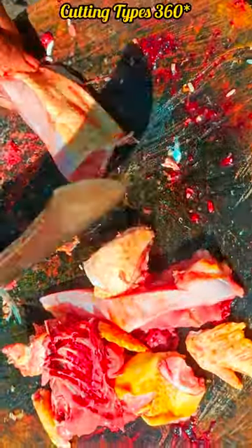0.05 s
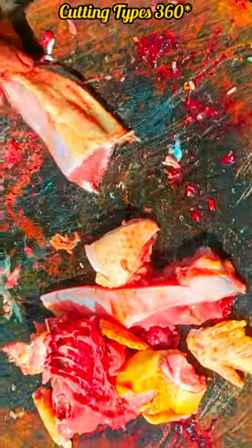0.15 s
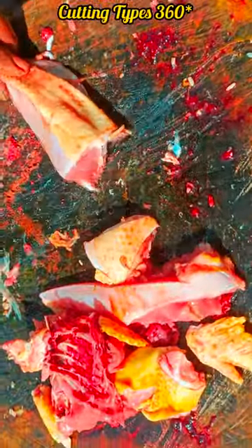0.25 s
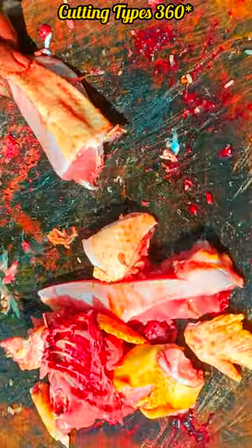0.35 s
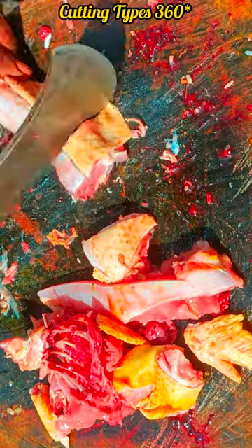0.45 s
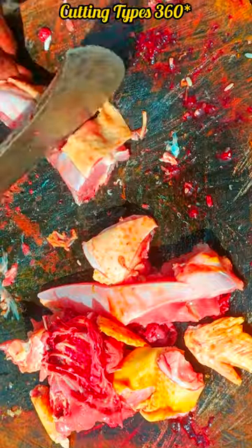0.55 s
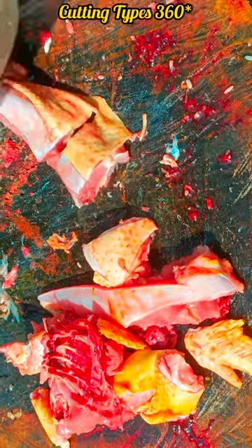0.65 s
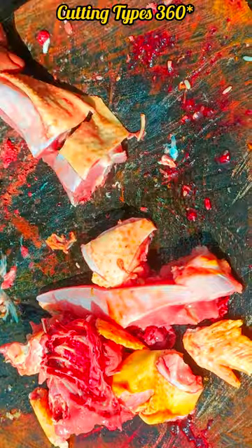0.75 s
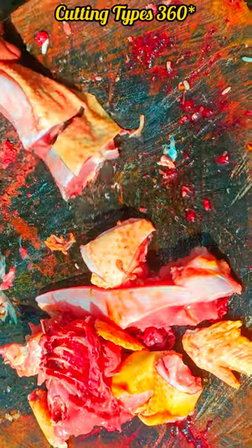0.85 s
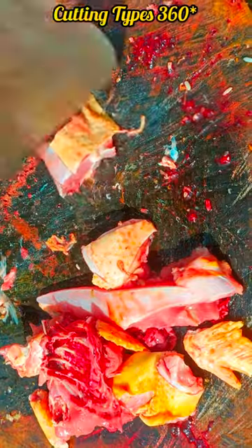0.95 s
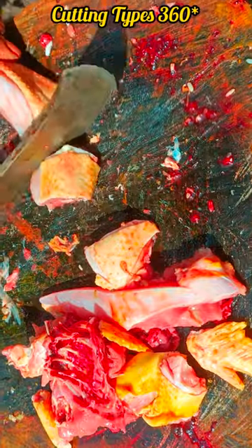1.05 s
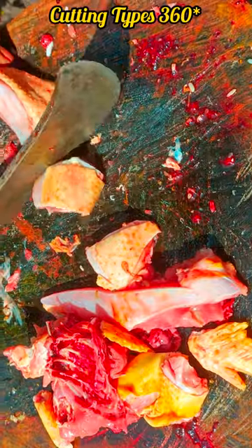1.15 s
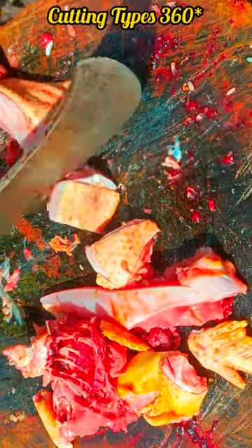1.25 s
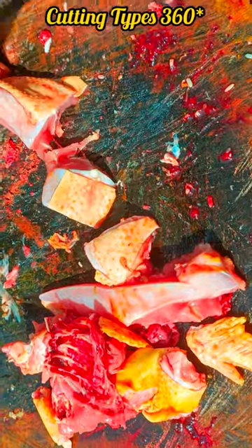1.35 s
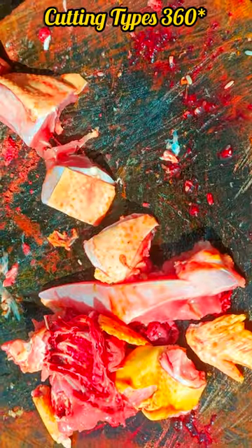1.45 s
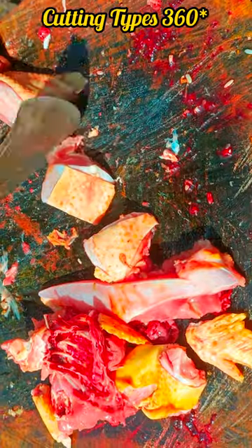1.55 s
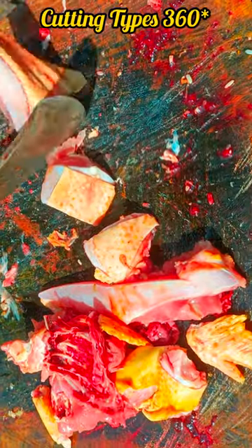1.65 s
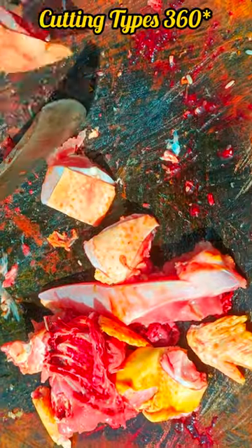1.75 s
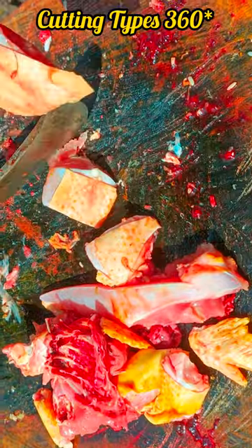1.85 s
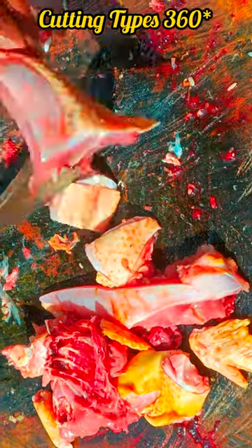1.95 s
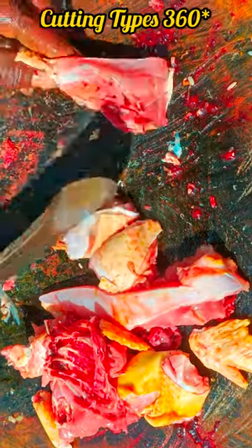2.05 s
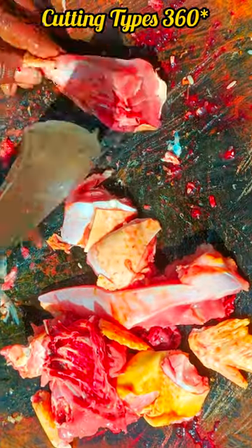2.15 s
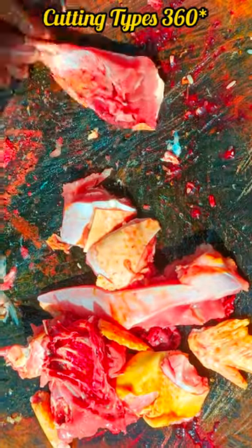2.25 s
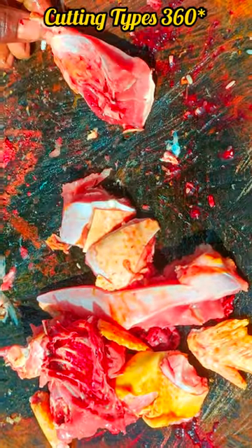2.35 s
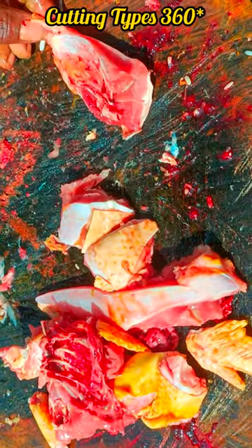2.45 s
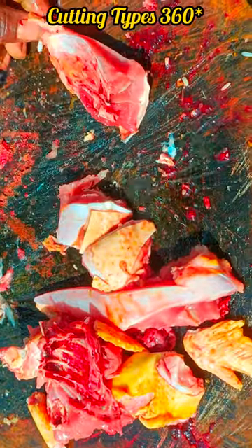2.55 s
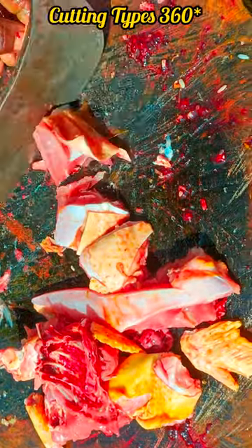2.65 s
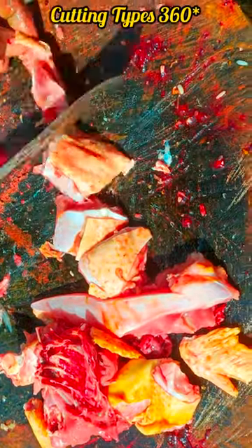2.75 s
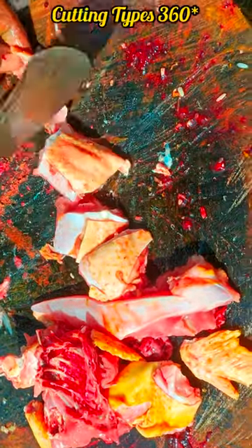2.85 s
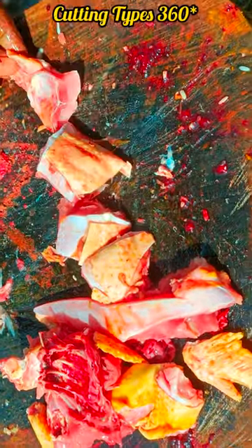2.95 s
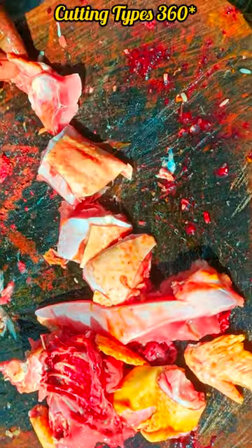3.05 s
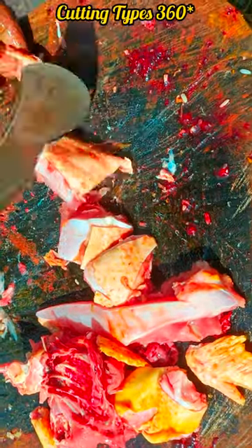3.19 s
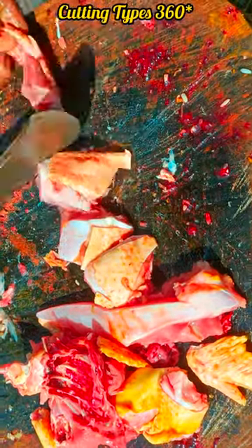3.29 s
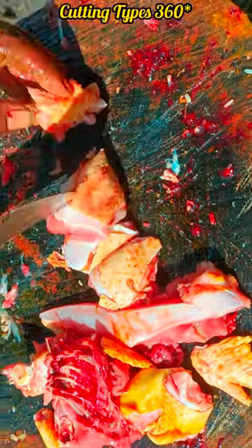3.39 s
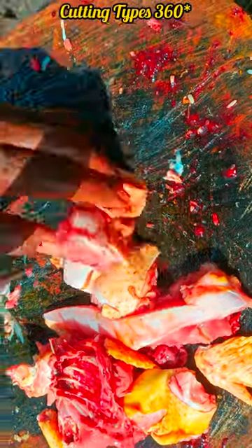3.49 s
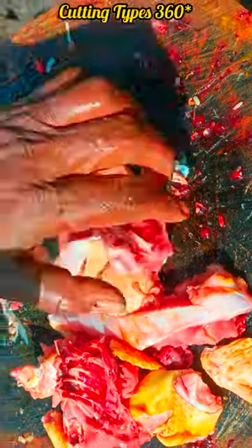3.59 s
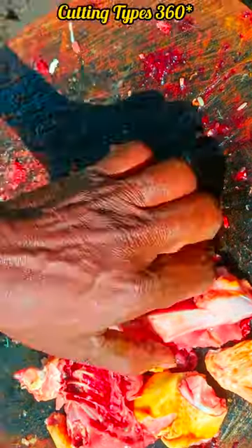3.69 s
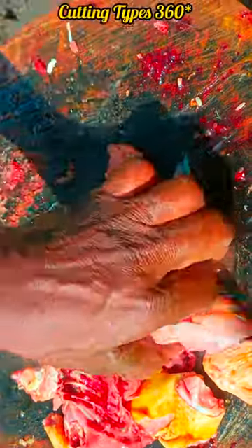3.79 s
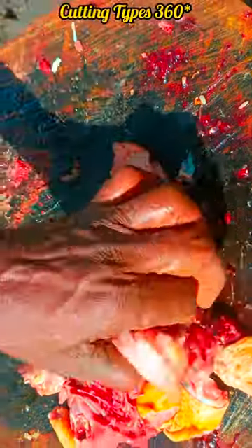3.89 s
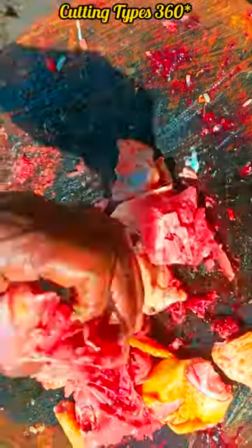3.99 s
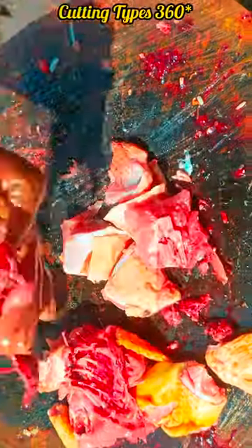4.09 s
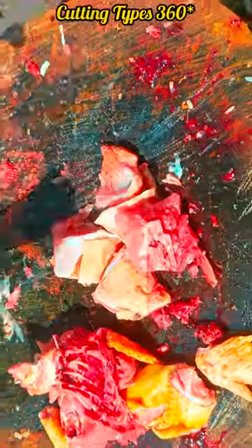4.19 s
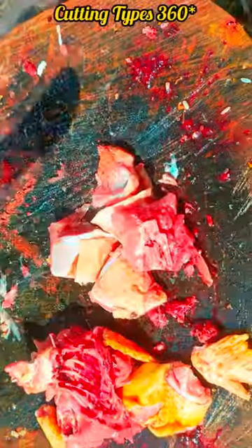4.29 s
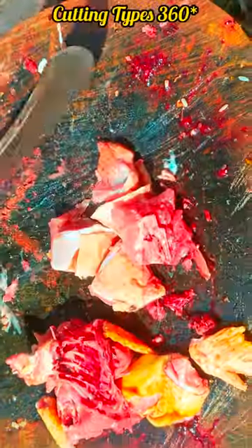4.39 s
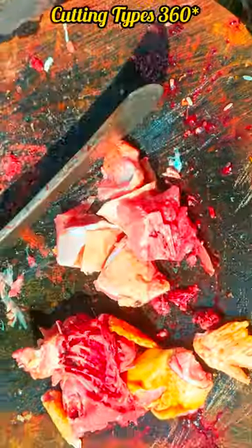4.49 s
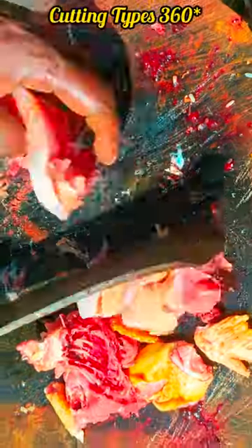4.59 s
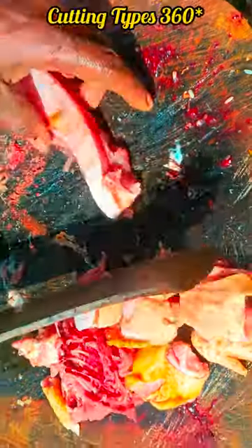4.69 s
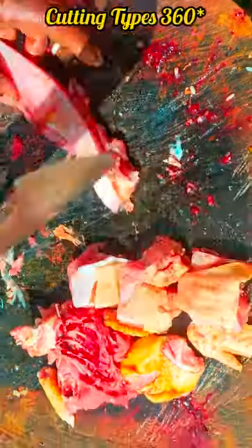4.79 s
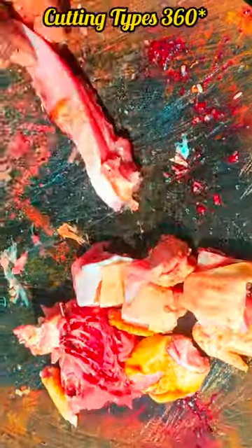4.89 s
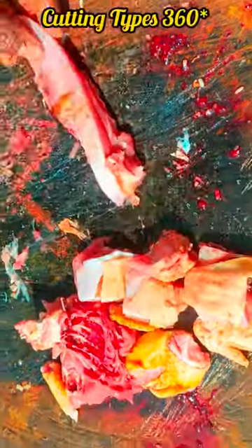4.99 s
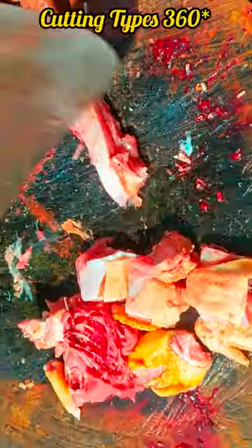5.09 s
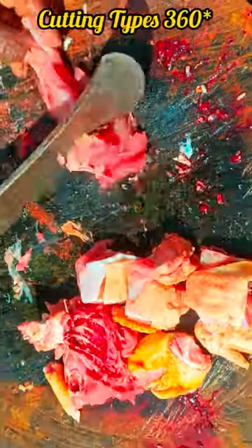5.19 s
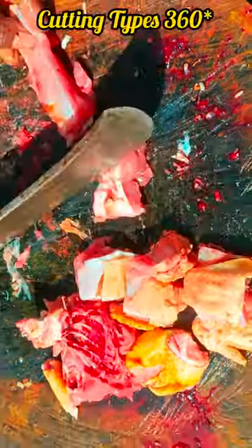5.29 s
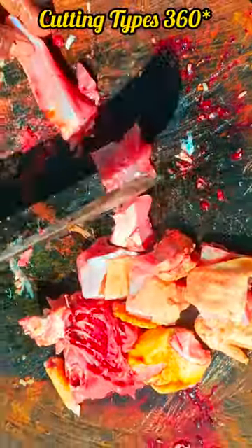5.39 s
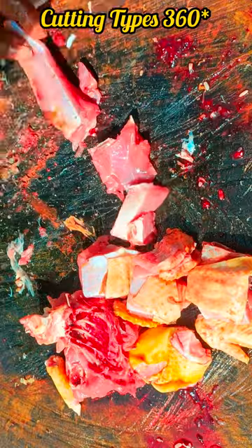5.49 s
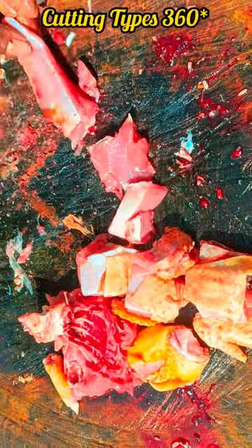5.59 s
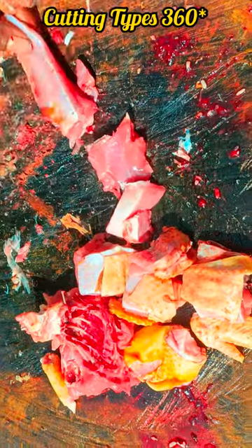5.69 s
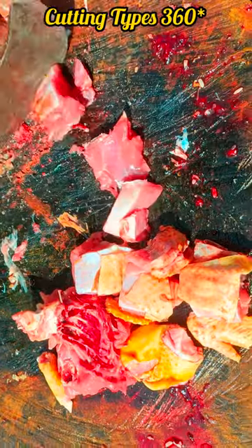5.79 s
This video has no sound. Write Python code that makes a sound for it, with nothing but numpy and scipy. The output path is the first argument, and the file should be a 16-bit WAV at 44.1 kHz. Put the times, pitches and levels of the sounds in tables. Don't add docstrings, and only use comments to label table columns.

```python
import sys
import numpy as np
from scipy import signal
from scipy.fft import rfft, irfft
from scipy.io import wavfile
from scipy.ndimage import uniform_filter1d

SR = 44100
rng = np.random.default_rng(int(sys.argv[2]) if len(sys.argv) > 2 else 0)


def rack_gain(trim_db):
    fader = np.asarray(trim_db, float)
    return 10 ** (fader / 20)


def pcm_store(signal):
    levels = np.round(np.clip(np.atleast_2d(signal), -1, 1) * 32767)
    wavfile.write(sys.argv[1], SR, levels.astype(np.int16).T)


N = 257544
TIME = np.arange(N) / SR
RING = TIME[:SR // 4]

# time steel meets block in s, thump in dB, edge click in dB, stand ring in dB,
# share sent to the walls in dB.
CHOP_BLOWS = [
    (0.4673, -7.5, -20, -27, -1.5),
    (1.0249, -6.5, -18, -25, -1),
    (1.6336, -6, -19, -41, -4),
    (2.6502, -6, -19.5, -20, 1),
    (3.2545, -5.5, -17, -21.5, 0),
    (5.1593, -9, -15, -31, -2.5),
    (5.806, -6.5, -18, -41, -9.5),
]
# frequency in Hz, level in dB, t60 in s.
BLADE_MODES = [(1001, -5.5, 0.13), (2600, -41.5, 0.016), (3450, 5, 0.022), (3660, -5, 0.037),
               (4510, -3, 0.05), (4700, -14, 0.036), (6315, 18.5, 0.028), (7780, 8.5, 0.027),
               (9100, -3, .05), (9000, -27, .05), (10660, 14, 0.031), (12800, 4, 0.017), (14260, -5, .04)]


def curve(table, hz):
    f, db = np.transpose(table)
    return np.interp(np.log(hz + 1), np.log(f), db)


def colour(x, table):
    cepstrum = irfft(np.log(rack_gain(curve(table, np.fft.rfftfreq(4096, 1 / SR)))))
    cepstrum[1:2048] *= 2
    cepstrum[2049:] = 0
    return signal.fftconvolve(x, irfft(np.exp(rfft(cepstrum))))[:N]


def band(x, hz, width):
    edges = [hz / width, min(hz * width, .45 * SR)]
    return signal.sosfilt(signal.butter(2, edges, "band", fs=SR, output="sos"), x)


def unit(x):
    return x / np.sqrt(np.mean(x ** 2))


def add(out, s, x):
    i = max(int(s * SR), 0)
    out[i:i + len(x)] += x[:N - i]


def ring(modes):
    return sum(rack_gain(db) * np.cos(2 * np.pi * hz * RING) * 1000 ** (-RING / t60) for hz, db, t60 in modes)


def grit(count, spread_db):
    draw = rng.standard_normal(count) * rack_gain(spread_db * rng.exponential(size=count))
    return unit(draw)


def push(out, s, db, ms):
    u = (RING[:400] - RING[200]) / (ms * 3.2e-4)
    add(out, s - RING[200], rack_gain(db) * (1 - 0.89 * u ** 2) * np.exp(-u ** 2 / 2))


def air(level_db=-56):
    # frequency in Hz, level in dB.
    air_gain = [(30, -34.5), (60, 1), (110, 12), (200, 1.5), (500, 0.5), (1200, 3), (2500, -2), (4500, -8),
                (6000, -17), (9000, -22.5), (16000, -24.5)]
    # frequency in Hz, level in dB.
    left_shade = [(300, -2), (700, -2), (1300, -6), (2500, -2), (4500, -3.5), (7000, 10.5)]
    low = signal.butter(1, 700, fs=SR, output="sos")
    shared = signal.sosfilt(low, rng.standard_normal(N))
    pair = [shared + (n - 0.31 * signal.sosfilt(low, n)) for n in rng.standard_normal((2, N))]
    sway = rack_gain(1.0 * unit(band(rng.standard_normal(N), 3.5, 18.0)))
    left = colour(colour(pair[0], air_gain), left_shade)
    return rack_gain(level_db) * sway * np.array([left, colour(pair[1], air_gain)])


def insects(left_db=-5):
    # start in s, length in s, frequency in Hz, level in dB.
    near_songs = [(0.363, 0.022, 4850, -54), (0.905, 0.03, 4830, -61), (.935, 0.056, 4700, -65),
                  (1.254, .1, 4700, -64.5), (1.896, 0.45, 4660, -68.5), (2.23, 0.33, 4830, -67),
                  (2.299, 0.17, 5070, -68), (3.535, 0.04, 4860, -59), (3.647, 0.57, 4640, -64.5),
                  (3.944, 0.089, 3415, -66), (4.552, 0.058, 4720, -55.5), (4.607, 0.067, 4970, -57),
                  (4.701, 0.29, 4600, -67.5)]
    # time in s, level in dB.
    chorus_level = [
        (0.0, -74),
        (0.44, -68),
        (0.8, -72.5),
        (1.89, -73.5),
        (3.17, -70),
        (3.61, -68.5),
        (4.36, -72.5),
        (4.65, -69),
        (4.96, -71),
        (5.84, -70),
    ]
    song_width_hz = 70
    songs = [(s, length, hz, song_width_hz, db) for s, length, hz, db in near_songs]
    songs += [(2.9 + k * .081, .03, 4300, song_width_hz, -66) for k in range(4)]
    songs += [(s, 0.31, 6200, 1300, -63.5) for s in (1.1, 2.212)]
    out = np.zeros(N)
    for s, length, hz, width_hz, db in songs:
        t = TIME[:int(length * SR)]
        span = SR / width_hz / 2
        tremble = uniform_filter1d(rng.standard_normal((2, SR)), int(span))[:, :len(t)] * np.sqrt(span)
        voice = (0.38 + tremble[0]) * np.cos(2 * np.pi * hz * t) + tremble[1] * np.sin(2 * np.pi * hz * t)
        add(out, s, rack_gain(db) * np.sin(np.pi * t / length) ** .5 * voice)
    swell = rack_gain(np.interp(TIME, *np.transpose(chorus_level)) + 4.5)
    chorus = [swell * unit(band(rng.standard_normal(N), 5000, 1.35)) for _ in range(2)]
    return (out + np.array(chorus)) * rack_gain(np.array([[left_db], [0]]))


def wind(bed_db=-62, gust_db=-14, rough=0.47):
    # time in s, peak in dB, length in ms.
    puffs = [(1.426, -43, 18), (1.488, -37.5, 17.5), (1.523, -34, 27), (1.559, -29, 10),
             (1.584, -15.5, 9.1), (1.614, -10.5, 4.5), (1.685, -16, 15.4), (1.739, -34.5, 37),
             (1.927, -31, 4.2), (1.978, -42, 12), (2.069, -33.5, 5.4), (2.102, -25.5, 9.6),
             (2.146, -35, 5.4), (2.337, -45, 12.5), (3.672, -34, 19.6), (3.719, -19.5, 6.8),
             (3.777, -43.5, 49), (4.311, -41.5, 16), (4.862, -34, 14), (5.021, -43.5, 14),
             (5.132, -32.5, 25), (5.345, -24, 21), (5.363, -18.5, 5.06), (5.396, -25.5, 16),
             (5.425, -18.5, 9.9), (5.495, -31.5, 44), (5.521, -33.5, 10.5), (5.671, -31.5, 8.8)]
    out, gust = np.zeros(N), np.zeros(N)
    u = RING[:4000] - RING[2000]
    for (s, db, ms), turn in zip(puffs, rng.random(len(puffs))):
        hz = 124 + 1.86 * db + 168 / ms
        swell = rack_gain(db) * np.exp(-(u / (ms * 7e-4)) ** 2)
        ragged = unit(band(band(rng.standard_normal(len(u)), 1.37 * hz, 1.04), 1.43 * hz, 1.45))
        add(out, s - RING[2000], swell * (np.cos(2 * np.pi * (hz * u + turn)) + rough * ragged))
        add(gust, s - RING[2000], rack_gain(db + gust_db) * np.exp(-(u / 0.02) ** 2))
    flutter = unit(band(rng.standard_normal(N), 4, 3.0))
    out = out + rack_gain(-66 + 3.5 * flutter) * unit(band(rng.standard_normal(N), 42, 1.3))
    return out + (gust + rack_gain(bed_db + 4.8 * flutter)) * unit(band(rng.standard_normal(N), 85, 1.4))


def blade():
    # start in s, level in dB, length in ms, treble in dB.
    taps = [
        (0, -35.5, 19, -12),
        (.0085, -27.5, 8.4, -20.5),
        (0.023, -36.5, 11.4, -17),
        (0.035, -47, 6, -25),
        (4.483, -42.5, 67, -9),
        (4.513, -36.5, 5, -12.5),
        (4.516, -43, 34, -6),
        (4.527, -31.5, 31, -8.5),
    ]
    out = np.zeros(N)
    for s, db, ms, treble_db in taps:
        phase = RING * 4000 / ms
        swell = rack_gain(db) * phase * np.exp(1 - phase)
        modes = [(hz * (1 + 0.0096 * rng.standard_normal()), g + treble_db * (hz > 5500), t60)
                 for hz, g, t60 in BLADE_MODES]
        add(out, s, swell * (ring(modes) + rack_gain(-12) * band(grit(len(RING), 2.0), 3300, 2.5)))
    return out


def block(blows, ring_db=-27, edge_db=-28, detune=0.05, scatter_db=2.0, damping=0.44):
    # frequency in Hz, level in dB, t60 in s.
    wood_modes = [(205, -14, 0.01), (225, -7.5, 0.083), (269, -7.5, 0.071), (312, -23.5, 0.12),
                  (430, -17.5, 0.013), (561, -12.5, 0.055), (670, -26.5, 0.069)]
    # frequency in Hz, level in dB, t60 in s.
    edge_modes = [(812, -4.5, 0.05), (1034, 0, 0.05), (1330, -11, 0.068), (1540, -6, 0.015),
                  (1803, -3.5, 0.11), (2050, -24, 0.15), (2718, -12.5, 0.0066)]
    out = np.zeros(N)
    spots = rng.standard_normal((len(blows), 2, 2 * len(edge_modes)))
    for (s, db, ms, click_db), spot in zip(blows, spots):
        force, edge = np.zeros(len(RING)), np.zeros(len(RING))
        push(force, .01, db, ms)
        push(edge, .01 - .0004, click_db, 0.55)
        upper = [(hz * (1 + detune * a), g + scatter_db * b, damping * t60)
                 for (hz, g, t60), a, b in zip(edge_modes + edge_modes, *spot)]
        body = rack_gain(ring_db) * signal.fftconvolve(force, ring(wood_modes))
        body = body + rack_gain(edge_db) * signal.fftconvolve(edge + .15 * force, ring(upper))
        add(out, s - .01, force + edge + body[:len(RING)])
    return out


def handling(snap=0.98, wide=1.75):
    # time in s, peak in dB, centre in Hz, length in ms.
    ticks = [(.089, -54, 8600, 1.5), (0.099, -45, 6950, 1.6), (1.071, -37, 7500, 2.5),
             (3.587, -54, 9000, 1), (3.522, -52, 2500, 3), (3.91, -40, 8000, 5.5), (5.415, -53, 9000, 6.2),
             (4.655, -46, 9000, 1.5), (.1482, -50, 11000, 1.2), (2.1035, -41, 8000, 1.2),
             (2.1339, -38.5, 5850, 10), (2.7243, -41, 6300, 2.6), (2.785, -50.5, 9000, 6.9),
             (3.4417, -58, 12030, 1.3), (3.505, -50.5, 6900, 2), (3.6072, -52, 13000, 0.93),
             (3.6761, -51.5, 9900, 1), (3.567, -48, 3780, 1.33), (3.8174, -45, 8333, 2),
             (3.8547, -48, 13500, 0.85), (3.891, -37, 3660, 2.1), (3.9083, -40, 11020, 4),
             (4.086, -36, 3300, 5.4), (4.66, -33.5, 4500, 2), (4.66, -39, 11000, 2.05),
             (4.6684, -19.5, 3700, 7.5), (4.669, -25.5, 11120, 4.6), (4.6682, -18.5, 2600, 4.1),
             (4.9003, -42.5, 9000, 2.9), (5.3405, -43, 8650, 3.5), (5.5639, -56, 8000, 1.2),
             (5.574, -42, 3500, 4), (5.669, -21.5, 10200, 0.6), (5.67, -19, 2600, 0.38)]
    # start in s, length in s, level in dB, centre in Hz.
    drags = [(3.8, 0.063, -59, 5500), (3.619, 0.23, -67, 9000), (3.92, 0.075, -64, 9940),
             (4.4, 0.103, -58, 5200), (4.46, 0.076, -57, 3300), (4.58, 0.13, -51, 4600),
             (4.659, 0.13, -57.5, 2600), (4.69, 0.122, -56, 8100), (4.751, 0.24, -67.5, 7100),
             (5.4, 0.043, -62, 10630), (5.575, 0.045, -54, 2400), (3.4, .24, -67, 10000),
             (3.94, .24, -67, 8000), (3.2, .04, -62.5, 11000), (5.6, 0.13, -65, 7600),
             (5.25, 0.21, -69, 8500), (2.08, 0.043, -57.5, 9900), (2.12, .04, -56, 5000),
             (4.06, .06, -58, 1500), (3.5, .05, -60, 1200), (4.9, .06, -62, 600), (5.19, .075, -54, 5000),
             (.51, .06, -53, 4000), (4.47, .09, -56, 1800), (3.8, 0.034, -57, 10960),
             (5.77, 0.04, -54, 2520)]
    # start in s, end in s.
    rustles = [
        (3.42, 4.15),
        (4.5, 4.95),
    ]
    rustle_per_s = 45
    stray = [(a + (b - a) * when, -67 + 3.5 * -np.log(size), 10500 * (.7 + .6 * pitch), 1.2)
             for a, b in rustles for when, size, pitch in rng.random((int(rustle_per_s * (b - a)), 3))]
    out = np.zeros(N)
    t = RING[:2000]
    for s, db, hz, ms in ticks + stray:
        burst = np.exp(-t / (ms * 0.00086)) * rng.standard_normal(len(t))
        burst = burst + snap * np.sqrt(SR / hz) * (t == 0)
        add(out, s, rack_gain(db) * band(band(burst, hz, wide), hz, wide))
    for s, length, db, hz in drags:
        swell = np.sin(np.pi * np.clip(RING / length, 0, 1)) ** 1.6
        swell = swell * rack_gain(3.4 * unit(band(rng.standard_normal(len(RING)), 54, 1.57)))
        add(out, s, rack_gain(db) * swell * unit(band(grit(len(RING), 2.0), hz, 3.8)))
    return out


def scrape(damping=0.22, treble_db=-10):
    # start in s, length in s, level in dB.
    scrapes = [
        (4.479, 0.15, -56.5),
    ]
    # start in s, length in s, level in dB.
    rubs = [
        (5.563, .045, -50),
        (5.748, 0.064, -46),
        (5.134, .024, -52),
        (.448, .016, -56),
        (1.615, .018, -56),
        (2.634, .013, -54),
    ]
    # frequency in Hz, level in dB, t60 in s.
    rub_modes = [(2000, -2, 0.0034), (3500, 1, .006), (4300, -10, 0.0031), (8200, -1.5, 0.0053),
                 (11400, -5, 0.0071), (14000, -8, .003)]
    out = np.zeros(N)
    steel = ring([(hz, db + treble_db * (hz > 5500), damping * t60) for hz, db, t60 in BLADE_MODES[1:]])
    for table, body in ((scrapes, steel), (rubs, ring(rub_modes))):
        for s, length, db in table:
            rub = unit(signal.fftconvolve(grit(len(RING), 1.7), body)[:len(RING)])
            add(out, s, rack_gain(db) * np.sin(np.pi * np.clip(RING / length, 0, 1)) ** 0.36 * rub)
    return out


def bone(debris_s=0.029, swish_db=-33, steel_db=-36):
    # time in s, level in dB, length in ms, centre in Hz, patter in dB.
    cracks = [(0.4634, -15.5, 3.9, 5900, -14.5), (0.465, -11, 3.9, 4660, -32), (0.4762, -28, 1.2, 3500, -9),
              (1.0205, -19.5, 2.2, 2970, -21.5), (1.0222, -15.5, 2.4, 5600, -19.5),
              (1.0245, -15, 1.2, 4160, -31.5), (1.6322, -23, 4, 2100, -21.5), (1.6326, -28, 3, 5000, -18.5),
              (1.6328, -42, 1.8, 11000, -24), (1.6432, -33, 3, 4195, -29.5),
              (2.6466, -12, 2.1, 5300, -24.5), (2.647, -22.5, 1.8, 13500, -24.5),
              (3.2515, -30, 5.3, 5000, -18), (3.253, -24, 3, 2600, -16.5),
              (5.1544, -25.5, 6.3, 3500, -23.5), (5.157, -11.5, 2.5, 4266, -30),
              (5.1578, -19.5, 2, 8530, -19.5), (5.804, -14, 4.5, 5505, -45), (5.8145, -42, 2.7, 4265, -20)]
    # frequency in Hz, level in dB.
    crack_gain = [(300, -32), (1000, -3), (2000, 5.5), (4000, -3), (6000, -0.5), (9000, -6), (13000, 0.5),
                  (17000, -2.5)]
    # frequency in Hz, level in dB, t60 in s.
    steel_modes = [(2100, 0, 0.018), (2970, -7, 0.006), (3900, -1, 0.016), (4657, -7, 0.02),
                   (5175, -4, 0.005)]
    wide, rise_s = 4.0, 0.00077
    out, t = np.zeros(N), RING - RING[2000]
    for s, db, ms, hz, debris_db in cracks:
        shape = np.exp(-(t / (ms * 0.00098)) ** 2) + rack_gain(debris_db) * np.exp(-(t / debris_s) ** 2)
        shape = shape * np.exp(np.minimum(t, 0) / rise_s)
        shape = shape + rack_gain(swish_db) * np.exp(t.clip(max=0) / 0.009) * (t < 0)
        burst = unit(shape * grit(len(RING), 2.6)) * np.sqrt(np.mean(shape ** 2))
        broad = band(band(burst, hz / 1.5, wide), hz / 1.5, wide)
        add(out, s - RING[2000], rack_gain(db) * (0.55 * broad + band(burst, hz, 1.5)))
    out = colour(out, crack_gain)
    return out + rack_gain(steel_db) * signal.fftconvolve(out, ring(steel_modes))[:N]


def stand():
    # frequency in Hz, level in dB, rise in s.
    frame_modes = [(743, -3.5, 0.013), (784, -10.5, 0.0082), (1133, -17, 0.01)]
    out = np.zeros(N)
    drone = sum(rack_gain(db) * RING / rise * np.exp(1 - RING / rise) * np.sin(2 * np.pi * hz * RING)
                for hz, db, rise in frame_modes)
    for s, _, _, stand_db, _ in CHOP_BLOWS:
        add(out, s, rack_gain(stand_db) * drone)
    return out


def hum(steady=.4):
    # start in s, frequency in Hz, level in dB, t60 in s.
    tones = [(.468, 1050, -26, .07), (.472, 2200, -34, .15), (.472, 3850, -38, .15), (.472, 4610, -38, .15),
             (.472, 5300, -42, .13), (.47, 8350, -54, .2), (1.026, 1000, -30, .06), (1.028, 2030, -33, .2),
             (1.028, 3950, -37, .2), (1.028, 4600, -37, .15), (1.028, 1520, -44, .15),
             (1.635, 1100, -36, .06), (1.634, 2120, -29, .09), (1.634, 3940, -36, .09),
             (1.634, 4700, -37, .1), (2.648, 1040, -22, .06), (2.651, 1850, -36, .12),
             (2.655, 3900, -44, .15), (2.655, 4800, -42, .13), (2.653, 8130, -54, .2),
             (3.254, 1030, -27, .06), (3.257, 1860, -28, .09), (3.26, 2170, -34, .13),
             (3.257, 2950, -42, .12), (3.257, 3750, -42, .15), (3.257, 5100, -42, .1),
             (5.157, 1030, -23, .07), (5.161, 1800, -38, .1), (5.159, 2660, -34, .16),
             (5.157, 4110, -33, .15), (5.161, 4840, -42, .12), (5.161, 7900, -48, .2),
             (5.804, 2100, -27, .05), (5.807, 1400, -36, .07), (4.458, 1250, -33, .05),
             (4.5, 1500, -46, .15), (4.668, 2150, -29, .04)]
    width, rise_s = .075, .003
    out = np.zeros(N)
    for s, hz, db, t60 in tones:
        count = int(SR / (width * hz) / 2)
        noise = rng.standard_normal((2, len(RING)))
        a, b = uniform_filter1d(uniform_filter1d(noise, count), count) * np.sqrt(count)
        voice = (steady + a) * np.cos(2 * np.pi * hz * RING) + b * np.sin(2 * np.pi * hz * RING)
        add(out, s, rack_gain(db) * (1 - np.exp(-RING / rise_s)) * 1000 ** (-RING / t60) * voice)
    return out


def yard(near, wet, level_db=-36, start_s=0.0018, hold_s=0.032, far_db=-16):
    # delay in ms, level in dB.
    echoes = [(7.5, -13.5), (11.8, -8), (18, -15), (22, -22.5), (26, -39), (31.3, -23)]
    # centre in Hz, level in dB, t60 in s.
    scatter = [(152.6, -2.5, 0.17), (450, -4, 0.22), (1259, 3, .09), (3500, 3, 0.071), (8000, -3, 0.055),
               (14100, -8.5, .09)]
    far_t60_s = 0.28
    out = []
    shared = rng.standard_normal(len(RING))
    for port_ms in (0, .35):
        own, tail, echo = rng.standard_normal(len(RING)), 0, np.zeros(len(RING))
        for k, (ms, db) in enumerate(echoes):
            echo[int((ms + (-1) ** k * port_ms) * SR / 1000)] = rack_gain(db)
        for hz, db, t60 in scatter:
            fade = 1000 ** (-np.maximum(RING - hold_s, 0) / t60 - RING / 0.3)
            fade = fade + rack_gain(far_db) * 1000 ** (-RING / far_t60_s)
            mix = min(hz / 1100, .95)
            noise = band(np.sqrt(1 - mix ** 2) * shared + mix * own, hz, 1.7)
            tail = tail + rack_gain(db) * np.clip(RING / start_s, 0, 1) ** 2 * fade * noise
        tail = tail * rack_gain(3.0 * unit(band(rng.standard_normal(len(RING)), 120, 2.0)))
        out.append(near + signal.fftconvolve(wet, echo + rack_gain(level_db) * tail)[:N])
    return np.array(out)


def scene():
    # time in s, level in dB, contact in ms, edge click in dB.
    knock_blows = [
        (.012, -41, 2.8, -52),
        (0.026, -46.5, 2.5, -72),
        (.5096, -28.5, 2.4, -54.5),
        (1.683, -52.5, 1.13, -114),
        (4.4593, -18, 1.5, -31),
        (4.516, -40, 2.5, -39),
        (4.532, -32.5, 0.7, -69),
        (4.555, -30, 1.75, -44.5),
        (4.668, -52.5, 2.1, -73),
        (5.836, -45, 1.7, -72),
    ]
    # time in s, level in dB, contact in ms.
    flesh_slaps = [
        (.4605, -34, 2.0),
        (1.0197, -27, 1.7),
        (1.6283, -25, 2.2),
        (2.643, -34, 1.8),
        (3.2495, -25, 1.7),
        (5.1535, -28, 1.7),
        (5.8005, -28, 2.6),
    ]
    # frequency in Hz, level in dB.
    wall_gain = [(200, 0.5), (600, -2), (1300, 0), (2100, 1), (3000, -5.5), (4300, 1), (6000, -2),
                 (12000, -2)]
    contact_ms = 1.408
    thumps = [(s, db, contact_ms, click_db) for s, db, click_db, _, _ in CHOP_BLOWS]
    slaps = [(s, db, ms, db - 20) for s, db, ms in flesh_slaps]
    heavy = block(thumps + slaps) + bone()
    knocks = band(band(block(knock_blows), 520, 3.6), 520, 3.8)
    light = knocks + blade() + scrape()
    walls_db = np.interp(TIME, [row[0] for row in CHOP_BLOWS], [row[4] for row in CHOP_BLOWS])
    near = heavy + light + stand() + hum() + handling()
    wet = colour(heavy, wall_gain) * rack_gain(walls_db) + rack_gain(-11.0) * light
    sound = yard(near, wet) + insects() + air()
    sound[0] += wind()
    return sound


def low_pass(x):
    return signal.sosfilt(signal.butter(12, 16830, fs=SR, output="sos"), x)


def record(dry):
    # frequency in Hz, level in dB.
    left_gain = [(40, -12), (150, 0), (4500, 0), (5500, -6), (6500, -5.5), (7500, -2), (8200, 5), (9000, 0),
                 (12000, -1), (15800, -4), (16500, -30)]
    # frequency in Hz, level in dB.
    right_gain = [(40, -12), (150, .5), (700, 1.5), (1300, 2.5), (2400, 7), (4300, 11.5), (5400, 10),
                  (6200, 1), (7000, -11), (8300, -15), (10500, -16), (12500, -12), (14500, -5), (15800, -5),
                  (16500, -30)]
    pole = signal.butter(2, 1500, fs=SR)[1]
    right = signal.lfilter(pole[::-1], pole, colour(dry[1], right_gain))
    ports = np.array([colour(dry[0], left_gain), right])
    ports[0] = np.roll(ports[0], 6)
    ports = ports + rack_gain(-85.0) * rng.standard_normal(dry.shape)
    return low_pass(0.91 * np.tanh(ports / 0.94))


dry = scene()
out = record(dry)
pcm_store(out)
```